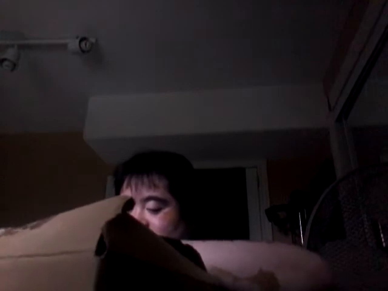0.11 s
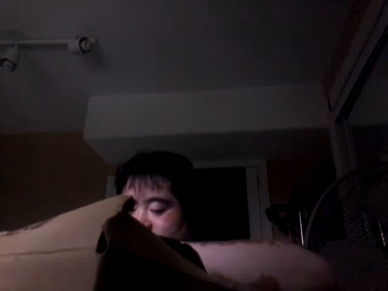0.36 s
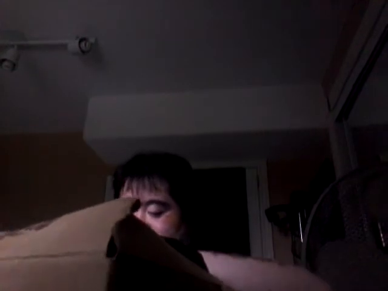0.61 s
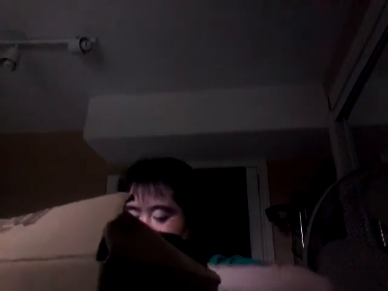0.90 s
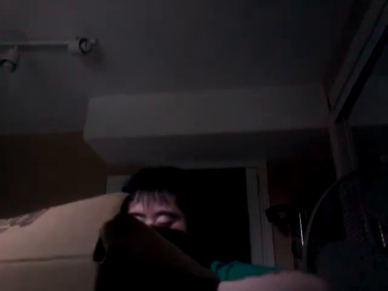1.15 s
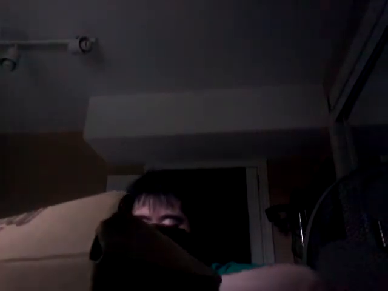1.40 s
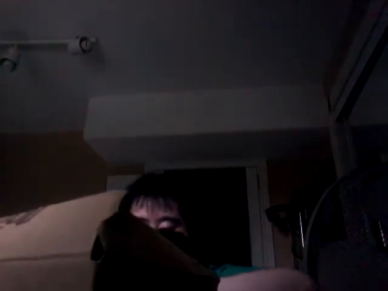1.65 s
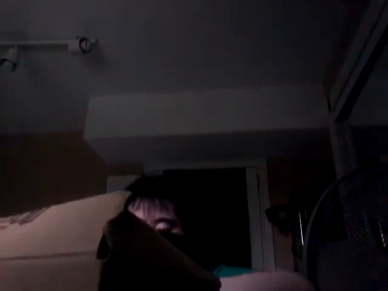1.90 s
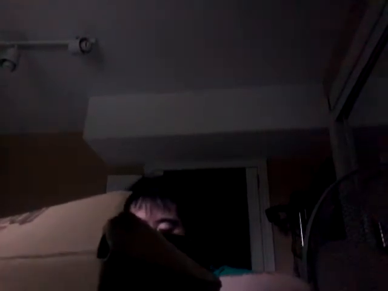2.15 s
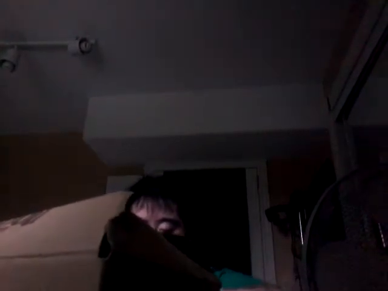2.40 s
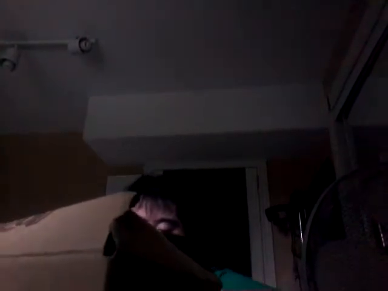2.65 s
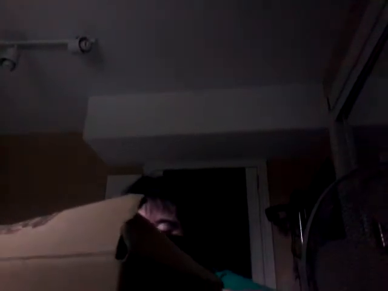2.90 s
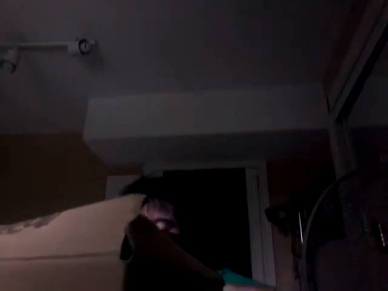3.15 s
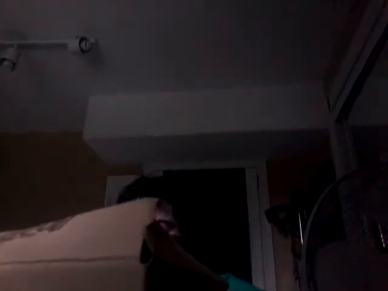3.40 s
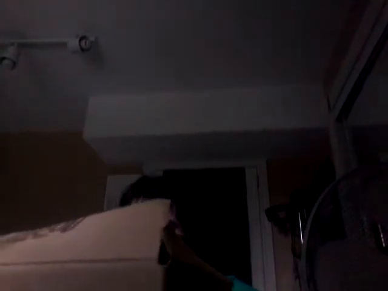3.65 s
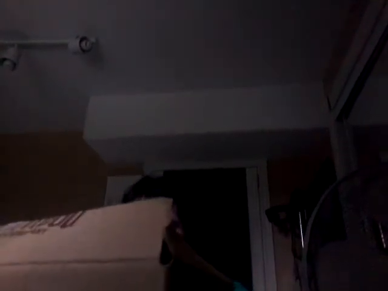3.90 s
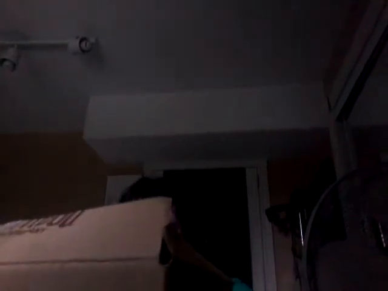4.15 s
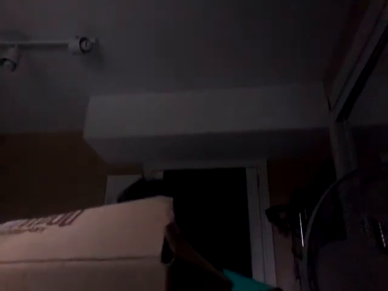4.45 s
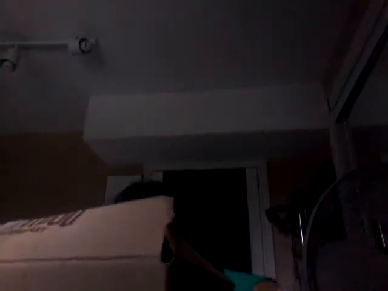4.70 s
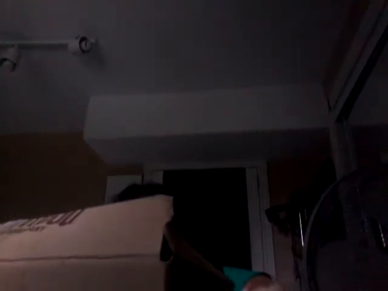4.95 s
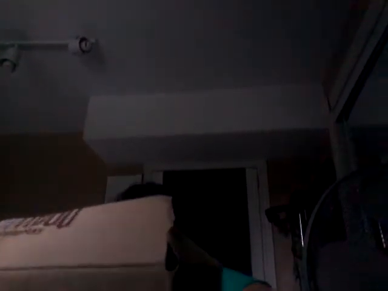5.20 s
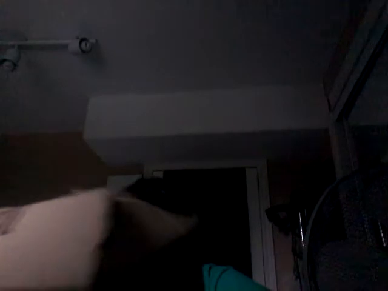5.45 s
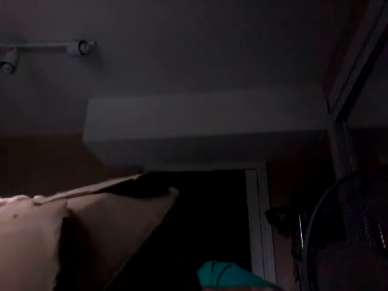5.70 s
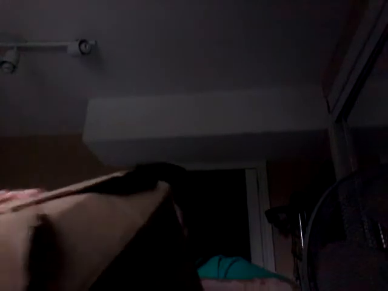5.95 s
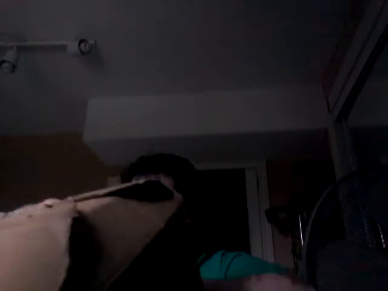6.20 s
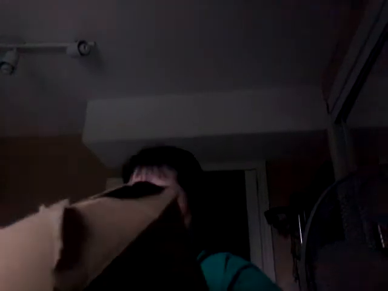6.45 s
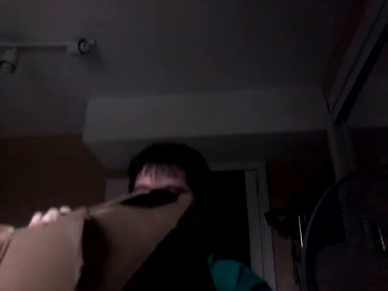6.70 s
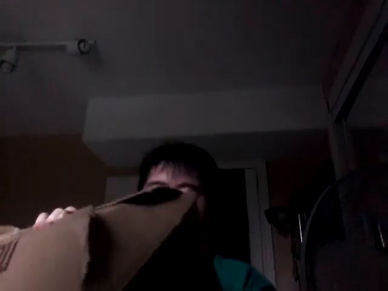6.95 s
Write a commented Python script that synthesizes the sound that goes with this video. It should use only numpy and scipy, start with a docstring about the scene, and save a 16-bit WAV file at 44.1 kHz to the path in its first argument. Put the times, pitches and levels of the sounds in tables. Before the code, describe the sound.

Close to a phone microphone in a small room, hands work open a cardboard box. Scraping and early snaps come with hollow knocks, then quieter rubbing. Loud cracks and booms burst out around three seconds, followed by a near lull. Another cluster of snaps and thumps leads into a short squeaky flap scrape, then a rapid run of bright snaps and a last tick and squeak.

```python
"""A cardboard box is forced open by hand in a small room, close to a phone microphone.
Glue and fibres let go in snaps: ringing clicks, each with a wall echo and a short rip of noise grains.
Lone fibres and creases tick, flap edges squeal as friction noise in sliding resonances, and hands
scrape the board as grainy noise. The hollow box booms in decaying sines when it is knocked or bent,
and hums under the moving hands; a faint hush of filtered noise lies behind it all."""
import sys
import numpy as np
from scipy import signal
from scipy.io import wavfile
from scipy.ndimage import uniform_filter1d

SR = 44100
rng = np.random.default_rng(int(sys.argv[2]) if len(sys.argv) > 2 else 0)


def dump(signal):
    """Clip the signal to [-1, 1] and save it as 16-bit WAV at the path in sys.argv[1]."""
    limited = np.clip(np.atleast_2d(signal).T, -1, 1)
    pcm = np.round(limited * 32767).astype(np.int16)
    wavfile.write(sys.argv[1], SR, pcm)


def rack_gain(trim_db):
    """Turn a fader trim in dB into the linear factor to multiply a signal by."""
    fader = np.asarray(trim_db, float)
    return 10 ** (fader / 20)


N = 312228  # length of the scene [samples]


def evened(x):
    """Scales to rms 1."""
    return x / np.sqrt(np.mean(x ** 2) + 1e-20)


def wander(count, window):
    """A slow random curve of rms 1: white noise averaged over a window [samples]."""
    return evened(uniform_filter1d(rng.standard_normal(count), size=window))


def add(mix, start, sound):
    """Mixes a sound in at start [s]."""
    part = mix[round(start * SR):][:len(sound)]
    part += sound[:len(part)]


def coloured(x, points):
    """Causal minimum-phase filter through (frequency [Hz], gain [dB]) points."""
    hz, db = np.transpose(points)
    bins = np.fft.rfftfreq(8192, 1 / SR)
    half = np.log(rack_gain(np.interp(np.log(bins + 1), np.log(hz), db)))
    # the Hilbert transform of the log gain gives the phase
    log_response = np.conj(signal.hilbert(np.r_[half, half[-2:0:-1]]))
    impulse = np.fft.ifft(np.exp(log_response)).real[:4096]
    return signal.oaconvolve(x, impulse)[:len(x)]


def resonate(x, hz, width):
    """A resonance of gain 1 and given width [Hz] that follows the curve hz."""
    turn = np.exp(2j * np.pi * np.cumsum(hz * np.ones(len(x))) / SR)
    r = np.exp(-np.pi * width / SR)
    # shift the pitch down to 0 Hz, smooth, shift back
    return 2 * (turn * signal.lfilter([1 - r], [1, -r], x / turn)).real


def treble(x):
    """The part above the ring of the board."""
    return signal.sosfilt(signal.butter(3, 6000, "high", fs=SR, output="sos"), x)


def swell(t, rise, held, t60):
    """Rises, holds, then dies away by 60 dB in t60 [s]; silent before t = 0."""
    return np.clip(t / rise, 0, 1) ** 2 * rack_gain(-60 * np.clip(t - rise - held, 0, None) / t60)


# colour of the quiet room's air: (frequency [Hz], density [dB per Hz])
AIR_COLOUR = [(60, -6.5), (900, -8.5), (4000, -54), (16000, -30.5)]


def hush():
    """The hush of the room: steady noise in the colour of the air."""
    return rack_gain(-57.5) * evened(coloured(rng.standard_normal(N), AIR_COLOUR))


ECHO_S = .0062  # delay of the nearest wall [s]


def room(x):
    """A small room: dense reflections start after the nearest wall and die by 60 dB in 0.28 s."""
    t = np.arange(SR // 3) / SR
    tail = rng.standard_normal(len(t)) * rack_gain(-60 * t / .28) * (t > ECHO_S)
    return x + rack_gain(-12) * signal.oaconvolve(x, tail / np.linalg.norm(tail))[:N]


# the hands on the box all the while: (time [s], drag on the board [dB],
# its treble against the drag [dB], shaking of the panels [dB])
HANDS_ON_BOX = [(0, -46, -3, -41), (.7, -53, 6, -49), (1.1, -57, 0, -50), (1.75, -55.5, 6, -53),
                (2.0, -44.5, 5, -46), (2.8, -44.5, 1, -51), (3.0, -57, 4, -51), (3.3, -42, 2, -44),
                (3.74, -66, -3, -49), (4.05, -72, -2, -64), (4.28, -65, -6, -56), (4.38, -53, 4, -48),
                (4.8, -61, 3, -46), (5.28, -41, 0, -42), (5.4, -53, 2, -46), (5.8, -59, 5, -50),
                (6.13, -58, 8, -46), (6.3, -48, 6, -40), (6.55, -57, 0, -50), (7.078, -55, 0, -49)]


def hands():
    """Drag, treble and shaking [dB] at every sample, in straight lines between the points."""
    times, *columns = np.transpose(HANDS_ON_BOX)
    return [np.interp(np.arange(N) / SR, times, column) for column in columns]


# resonances of the hollow box, listed for side walls, bottom and flaps in turn:
# (frequency [Hz], level [dB], t60 [s])
BOX_PANELS = [
    [(225, 3.5, 0.1), (263.8, 4.5, 0.11)],
    [(66, -4, 0.1), (126.6, 1.5, 0.12), (142.8, -4, 0.19)],
    [(351.2, -4, 0.25), (435.5, -5, 0.095), (561.5, -3.5, 0.052)],
]


def rumble():
    """Lumpy pushes of the hands keep the panels humming."""
    pushes = rng.standard_normal(N) * rack_gain(3 * wander(N, 1200))
    hum = np.zeros(N)
    for panel in BOX_PANELS:
        for hz, level, t60 in panel:
            ring = resonate(resonate(pushes, hz, 5 / t60), hz, 10 / t60)
            hum += rack_gain(level) * evened(ring)
    shaking_db = hands()[2]
    return rack_gain(shaking_db) * evened(hum)


def fibres(count):
    """Dense tiny breaks of uneven size over a finer hiss, in bunches a few ms long."""
    per_s, spread_db, share = 4000, 3, .25  # share: the breaks' part of the power
    sizes = rack_gain(spread_db * np.minimum(rng.exponential(1, count), 5)) * rng.choice([-1., 1.], count)
    grains = evened(sizes * (rng.random(count) < per_s / SR))
    hiss = rng.standard_normal(count)
    bunches = rack_gain(1.7 * wander(count, 200))
    return evened(bunches * (np.sqrt(share) * grains + np.sqrt(1 - share) * hiss))


def click(hz, treble_db, lasts):
    """A break: a sharp puff, decaying over lasts [s], that rings its patch of board for a few cycles."""
    t = np.arange(SR // 3) / SR
    puff = rng.standard_normal(len(t)) * np.exp(-t / lasts)
    ring = np.sin(2 * np.pi * hz * t) * np.exp(-t / .001)
    sound = ring + rack_gain(-4) * puff + rack_gain(treble_db) * treble(puff)
    return sound / abs(sound).max()


# lowest and highest pitch of the creases under the hands: (low [Hz], high [Hz])
CREASE_PITCHES = (1100, 4500)


def crackle():
    """Scattered creases click, some 70 a second, each patch at its own pitch."""
    struck = rng.random(N) < 70 / SR
    sizes = rack_gain(4 * np.minimum(rng.exponential(1, N), 4)) * struck
    patch = rng.integers(0, 6, N)
    total = np.zeros(N)
    for k, hz in enumerate(np.geomspace(*CREASE_PITCHES, 6)):
        crease = click(hz, treble_db=-3, lasts=.001)[:400]
        total += signal.oaconvolve(sizes * (patch == k), crease)[:N]
    return total


def patchy(x):
    """The colour of rubbing changes over the board: patches some 600 Hz by 70 ms swell and fade."""
    spectrum = signal.stft(x, nperseg=512)[2]
    field = uniform_filter1d(rng.standard_normal(spectrum.shape), size=7, axis=0)
    field = uniform_filter1d(field, size=12, axis=1)
    return signal.istft(spectrum * rack_gain(3 * evened(field)), nperseg=512)[1][:len(x)]


# colour of the cardboard: (frequency [Hz], gain [dB])
BOARD_COLOUR = [(250, -4.5), (600, 3), (1600, 3.5), (2500, 3.5), (5000, 2), (8000, -24)]
# single scrapes of a hand or a flap:
# (start [s], level [dB], held [s], fade by 60 dB [s], treble against the level [dB])
SINGLE_SCRAPES = [(.035, -37, .4, .65, 4.5), (.865, -40, .03, .2, -3), (1.125, -48, .08, .45, -1),
                  (1.45, -47, .03, .2, -1), (1.85, -42, .02, 1.2, 2), (2.14, -41, .06, .25, 5),
                  (2.268, -31, .025, .17, 1), (2.435, -45, .02, .6, -1), (2.8, -32, .03, .25, 1),
                  (3.76, -43, .125, .12, -1), (4.14, -58, .02, .2, 6), (4.447, -33, .015, .3, 6),
                  (4.655, -40, .04, .2, -4), (4.83, -46, .08, .5, 2), (5.4, -43, .01, .35, -3),
                  (5.56, -45, .02, .8, 0), (5.882, -45, .1, .25, 1), (6.6, -49, .05, .8, 8),
                  (6.893, -36.5, .005, .6, -8)]


def rubbing():
    """Grains under the hands sound through the board: a drag that swells and nearly stops, and scrapes."""
    drag_db, treble_db, _ = hands()
    body_power, treble_power = rack_gain(drag_db) ** 2, rack_gain(drag_db + treble_db) ** 2
    t = np.arange(SR) / SR
    for start, db, held, t60, top_db in SINGLE_SCRAPES:
        power = (rack_gain(db) * swell(t, .022, held, t60)) ** 2
        add(body_power, start, power)
        add(treble_power, start, power * rack_gain(top_db) ** 2)
    grip_db = 1.7 * wander(N, 700)  # an uneven grip
    rustle_db = 1.8 * wander(N, 1500)  # the treble comes and goes in rustles
    grains = fibres(N)
    board = evened(patchy(coloured(grains, BOARD_COLOUR))) + rack_gain(4.5) * crackle()
    bright = rack_gain(rustle_db) * evened(treble(grains))
    return rack_gain(grip_db) * (np.sqrt(body_power) * board + np.sqrt(treble_power) * bright)


# a flap edge squealing: (start [s], level [dB], first pitch [Hz], last pitch [Hz],
# width of the narrower resonance [Hz], fade by 60 dB [s])
FLAP_SQUEALS = [(5.63, -36, 2300, 2500, 350, .2), (5.63, -38, 4100, 3300, 500, .25),
                (5.635, -43, 750, 950, 200, .2), (5.655, -34, 1950, 1480, 300, .24),
                (6.895, -40, 1960, 1950, 100, .6), (6.895, -39, 1570, 1600, 90, .15),
                (6.9, -41, 320, 450, 200, .4), (6.93, -42, 2500, 2680, 200, .7)]


def squeal(db, first_hz, last_hz, width, t60):
    """Friction noise caught in a sliding resonance."""
    t = np.arange(SR // 3) / SR
    hz = last_hz + (first_hz - last_hz) * np.exp(-t / .025)
    caught = resonate(resonate(fibres(len(t)), hz, width), hz, 2 * width)
    return rack_gain(db) * swell(t, .016, 0, t60) * evened(caught)


# knocks and bends of the walls:
# (time [s], side walls [dB], bottom against them [dB], flaps against them [dB])
KNOCKS_AND_BENDS = [(.105, -32, -20, -10), (0.298, -26, -27, -9), (0.415, -20, -24, -10),
                    (0.479, -21, -17, -4), (0.515, -26, -23, -12), (0.764, -27, -11.5, -1.5),
                    (0.882, -22.5, -10.5, -6), (1.06, -27.5, 3.5, -10.5), (2.028, -34.5, 3, 0),
                    (2.568, -32.5, -7, -15), (2.839, -29, -2, 4), (3.173, -18.5, -6.5, -2),
                    (3.349, -18, 0, 7.5), (3.469, -23.5, -1.5, 8), (3.81, -33, -4, -6),
                    (3.856, -27, -8, -5), (3.902, -31, -5, -5), (4.181, -36, 12.5, -24),
                    (4.472, -40, 12, 3), (4.532, -42.5, 11, -22), (4.697, -39.5, 8, 3.5),
                    (4.768, -48, 13, -10), (4.826, -27, 6.5, -14), (4.959, -32.5, 5, 4),
                    (5.031, -37, 12, -11), (5.054, -22, -3, 2), (5.077, -23, -2, -1), (5.116, -24, -0.5, 0),
                    (5.168, -30, 0, 0), (5.533, -34, -4, -2.5), (5.8, -33, -23, -31)]


def boom(db, bottom_db, flaps_db):
    """Each panel of the hollow box rings as hard as the blow reaches it."""
    t = np.arange(SR // 3) / SR
    ring = np.zeros(len(t))
    for share_db, panel in zip((0, bottom_db, flaps_db), BOX_PANELS):
        for hz, level, t60 in panel:
            gripped_hz = hz * (1 + .033 * rng.standard_normal())  # the grip detunes it
            ring += rack_gain(share_db + level - 60 * t / t60) * np.sin(2 * np.pi * gripped_hz * t)
    return rack_gain(db) * ring * (1 - np.exp(-t / .0024)) ** 2


# single fibres and creases clicking: (time [s], level [dB], pitch of the patch [Hz])
FIBRE_TICKS = [(0.416, -7, 1720), (0.48, -12, 900), (0.56, -17, 2300), (0.626, -19, 2200),
               (0.678, -23, 4500), (0.75, -17, 1400), (0.883, -11, 1390), (0.987, -23, 1720),
               (1.052, -22, 1640), (1.144, -23.5, 2840), (2.284, -12, 1500), (3.857, -20, 1200),
               (3.866, -19, 1300), (3.904, -19, 1210), (3.948, -28, 2500), (4.478, -19, 1100),
               (4.535, -26, 1200), (4.703, -23, 700), (4.958, -20, 700), (6.845, -7, 7600)]


def tick(db, hz):
    """One fibre or crease clicks; a higher patch has more treble."""
    return rack_gain(db) * click(hz, treble_db=5 * np.log2(hz / 2000), lasts=.0018)


# a torn patch rings at these multiples of its pitch: (ratio, ..)
PATCH_OVERTONES = (1, 1.55, 1.85)
# glue and fibres letting go:
# (time [s], level [dB], pitch of the patch [Hz], trailing rip against the level [dB])
GLUE_SNAPS = [(.127, -9, 1700, -18), (.187, -12, 3350, -18), (.762, -14, 1500, -16), (2.03, -19, 1590, -14),
              (2.843, -3, 1700, -19), (3.098, -17, 2060, -13), (3.176, -5, 1000, -16),
              (3.19, -6, 1750, -14), (3.215, -6, 2000, -20), (3.353, 0, 1450, -13), (3.474, -4, 1450, -13),
              (3.587, -7, 2900, -19), (4.886, -20, 2220, -12), (4.968, -5, 900, -17), (5.056, -5, 800, -17),
              (5.078, -4, 2780, -15), (5.12, -4, 900, -24), (5.123, -7, 2800, -15), (5.169, -5, 800, -22),
              (5.172, -6, 2480, -13), (5.2, -9, 2480, -13), (6.27, -3, 1040, -15), (6.272, -3, 2000, -13),
              (6.308, -3, 4100, -17), (6.333, -7, 1950, -24), (6.385, 0, 3300, -21), (6.408, -1, 2800, -21),
              (6.429, -3, 3300, -21), (6.458, -2, 3400, -24), (6.5, -11, 2900, -20)]


def snap(db, hz, rip_db):
    """A click comes back from the wall and trails off in a rip that keeps the colour of the patch."""
    t = np.arange(SR // 3) / SR
    small = signal.butter(3, .6 * hz, "high", fs=SR, output="sos")  # a small patch has no bass
    torn = fibres(len(t))
    crack = signal.sosfilt(small, click(hz, treble_db=-8, lasts=2.2 / hz))
    ring = np.zeros(len(t))
    for ratio in PATCH_OVERTONES:
        ring += resonate(resonate(torn, ratio * hz, .25 * hz), ratio * hz, .25 * hz)
    board = evened(signal.sosfilt(small, coloured(torn, BOARD_COLOUR)))
    body = evened(board + rack_gain(-7) * evened(ring))
    body_t60, treble_t60 = .24, .22  # [s]
    rip = body * rack_gain(-60 * t / body_t60) + evened(treble(torn)) * rack_gain(-60 * t / treble_t60)
    echo = rack_gain(-4) * np.roll(crack, round(ECHO_S * SR))
    return rack_gain(db) * (crack + echo + rack_gain(rip_db) * rip * (1 - np.exp(-t / .002)))


def scene():
    """Snaps, ticks, rubbing and squeals fill the room; the booms of the box are felt close by."""
    low, bright = rumble(), rubbing()
    for start, *row in KNOCKS_AND_BENDS:
        add(low, start, boom(*row))
    for play, table in ((squeal, FLAP_SQUEALS), (tick, FIBRE_TICKS), (snap, GLUE_SNAPS)):
        for start, *row in table:
            add(bright, start, play(*row))
    return (room(bright) + low)[None]


# response of the phone microphone: (frequency [Hz], gain [dB])
MIC_RESPONSE = [(35, -31), (75, 4), (5500, -0.5), (6500, 2.5), (8900, 10), (9800, 3.5), (11300, -13.5),
                (15400, -8.5), (15900, -44), (17000, -71)]


def microphone(sound):
    """The port of the close phone microphone peaks in the treble."""
    return coloured(sound, MIC_RESPONSE)


def roll_off(x):
    """The treble ends steeply here."""
    return signal.sosfilt(signal.butter(12, 16850, fs=SR, output="sos"), x)


def record(dry):
    """The microphone hears the box, a faint hush lies under everything, the loudest peaks round off."""
    mix = np.tanh(microphone(dry[0]) + hush())[None]
    return roll_off(mix)


dry = scene()
out = record(dry)
dump(out)
```